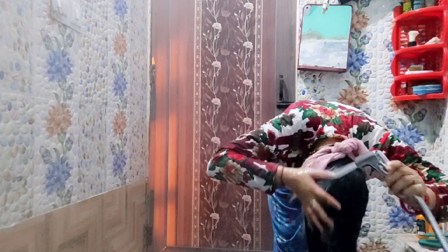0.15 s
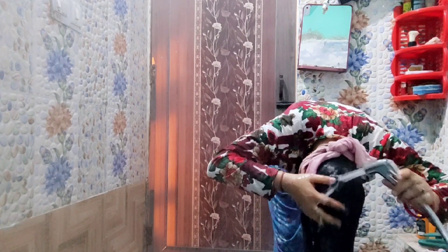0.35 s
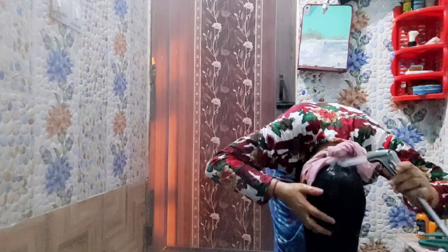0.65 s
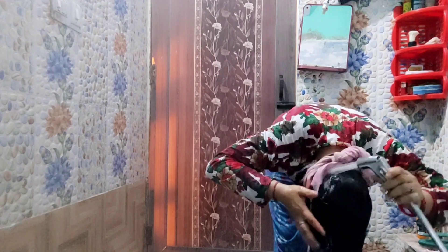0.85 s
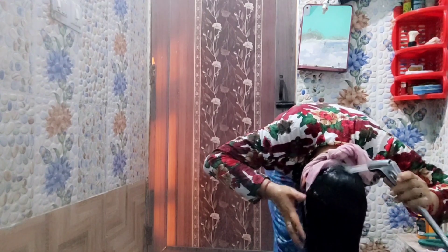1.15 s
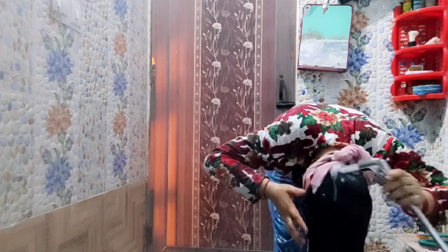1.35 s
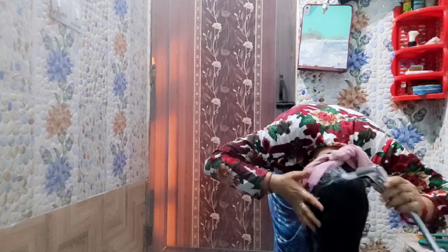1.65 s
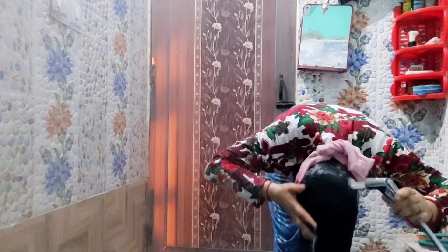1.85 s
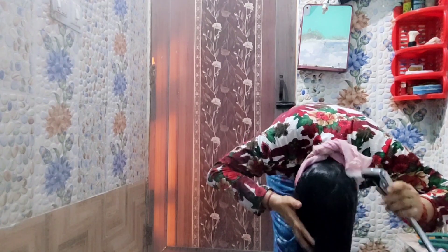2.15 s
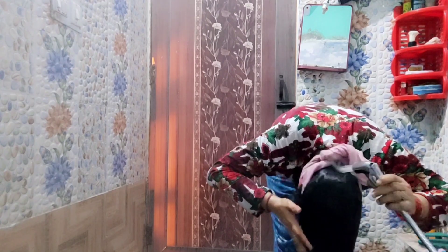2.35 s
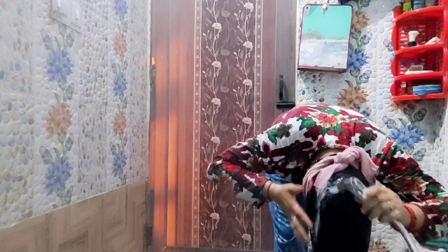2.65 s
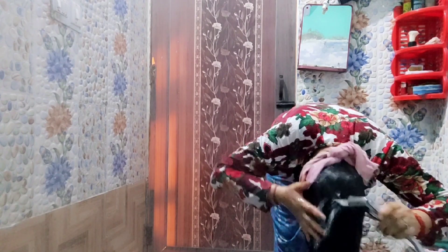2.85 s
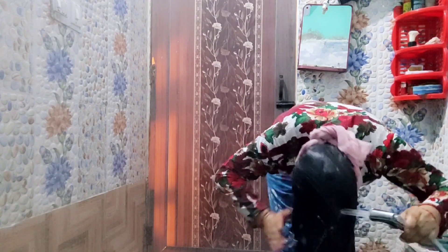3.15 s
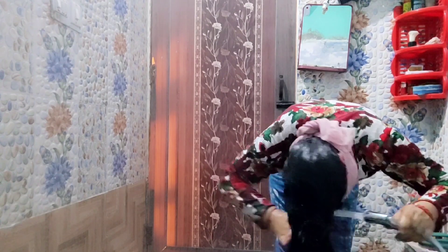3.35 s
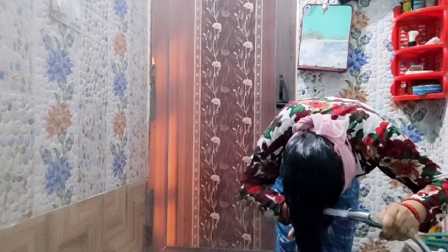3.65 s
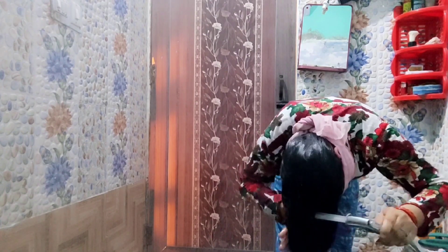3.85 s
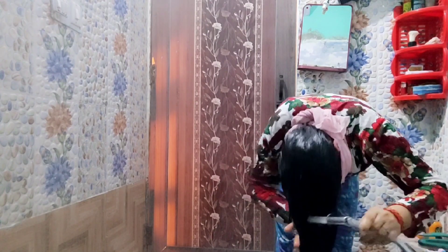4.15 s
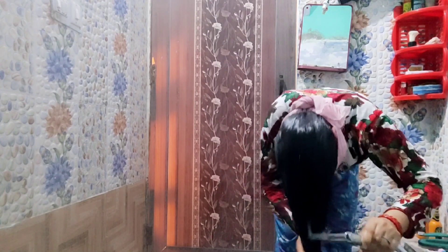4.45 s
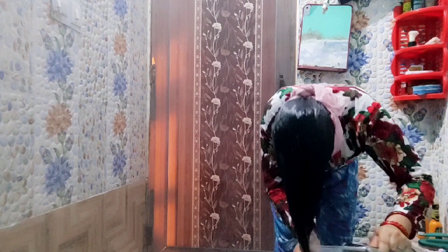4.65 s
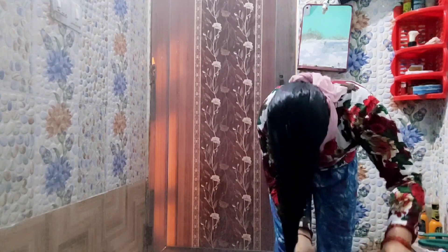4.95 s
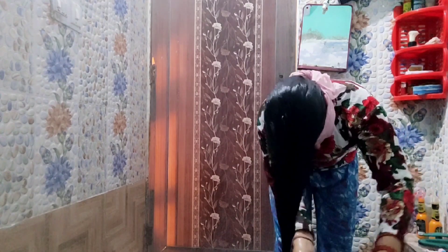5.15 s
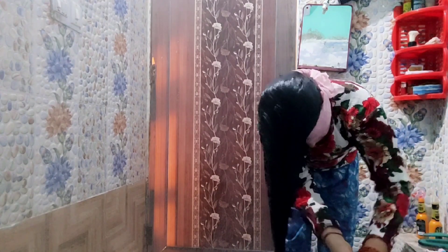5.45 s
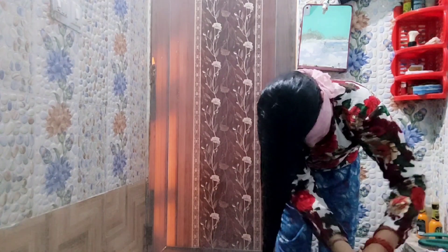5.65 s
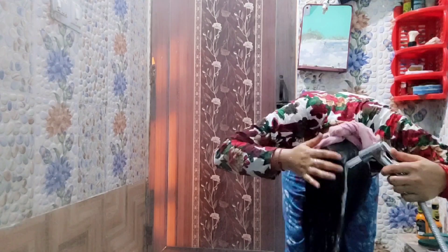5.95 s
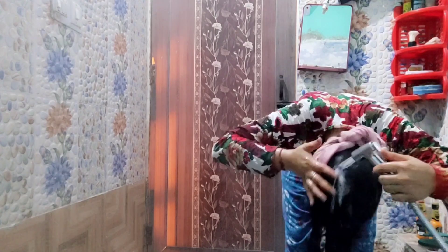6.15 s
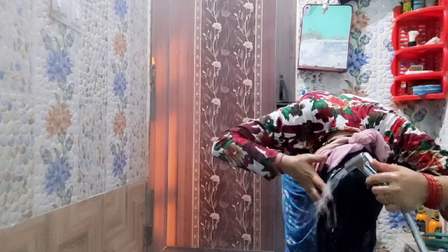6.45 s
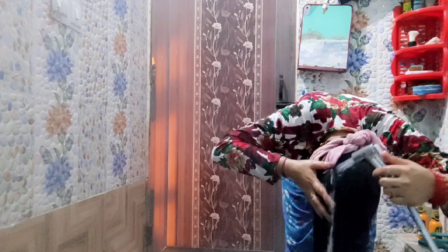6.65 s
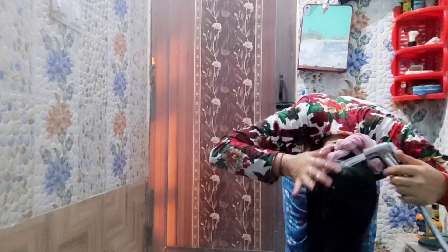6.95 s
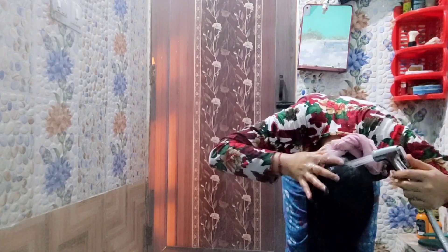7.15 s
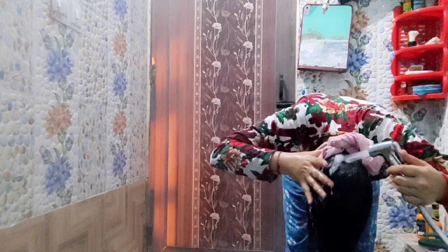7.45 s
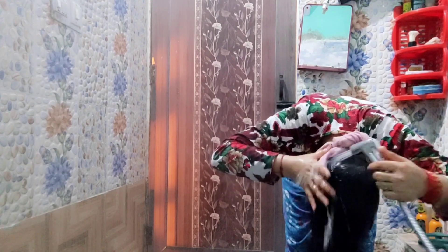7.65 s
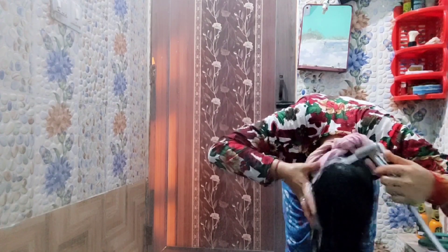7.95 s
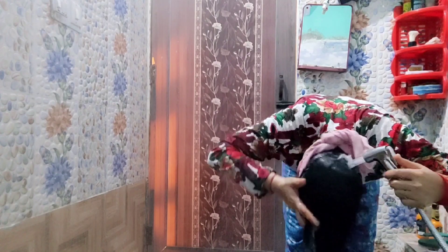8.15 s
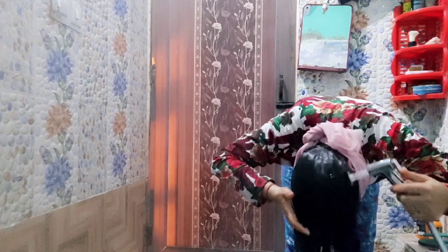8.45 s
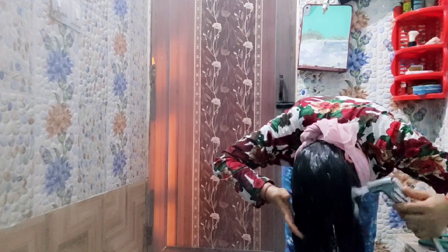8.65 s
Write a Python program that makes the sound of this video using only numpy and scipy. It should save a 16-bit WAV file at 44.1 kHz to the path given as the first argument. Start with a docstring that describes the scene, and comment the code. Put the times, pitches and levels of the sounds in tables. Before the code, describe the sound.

A handheld shower sprays wet hair in a small tiled bathroom, hissing and spattering brightly, cutting to a trickle once before bursting back.

```python
"""In a small tiled bathroom a handheld shower sprays wet hair. Jets, splash and mist are coloured noise
with random clicks; trapped air adds bubble tones, and a short noise burst sounds as each slap's rise ends.
The pocket between nozzle, hand and head rings hollow as a moving resonance; low gulps and narrow bands join it.
The valve closes and reopens once, a pump hums in sines over room tone, and the sound drops out twice.
Two microphone ports hear it, each favouring different treble."""
import sys
import numpy as np
from scipy import signal
from scipy.fft import rfft, irfft, next_fast_len
from scipy.io import wavfile
from scipy.ndimage import uniform_filter1d, map_coordinates

SR = 44100
rng = np.random.default_rng(int(sys.argv[2]) if len(sys.argv) > 2 else 0)


def materialize(psi):
    """Save the field psi as 16-bit PCM at rate SR to the path in sys.argv[1].

    A 1-D psi becomes a single channel; in a 2-D psi each row is a channel.
    """
    bounded = np.clip(np.atleast_2d(psi).T, -1, 1)
    quanta = np.round(bounded * 32767).astype(np.int16)
    wavfile.write(sys.argv[1], SR, quanta)


N = 387638

# Jet hiss, swelling as the nozzle sweeps over the head: (time [s], level at full flow [dB])
JET_LEVEL = [(0, -21), (.24, -19.5), (.32, -13), (.55, -14.5), (.85, -15.5), (1.0, -20.5), (1.22, -15.5),
             (1.68, -18.5), (1.93, -15.5), (2.2, -18.5), (2.48, -18.5), (2.63, -16), (2.7, -16),
             (2.84, -21), (3.06, -16), (3.3, -18), (3.58, -22), (4.05, -18.5), (4.18, -13), (4.42, -18.5),
             (4.66, -15.5), (4.78, -13.5), (5.07, -13), (5.27, -20.5), (5.44, -16), (6.09, -20),
             (6.3, -19.5), (6.58, -20), (6.68, -21.5), (6.77, -17.5), (6.92, -19.5), (7.23, -15.5),
             (7.5, -18.5), (7.76, -20.5), (7.81, -13.5), (8.02, -17), (8.13, -14), (8.37, -17), (8.54, -13),
             (8.79, -17)]
# Brief dips of the jets, followed by a jump where the peak is high enough: (time [s], peak [dB])
JET_SPURTS = [(0.2473, -8), (0.3052, 2), (0.38, -1.5), (0.4144, -1), (0.4894, 0.5), (0.5322, 1),
              (0.7841, -2.5), (0.8914, -12), (1.3234, -5.5), (1.725, -2), (2.3915, -5.5), (2.5546, -1.5),
              (2.5975, -22), (2.899, -1), (3.1527, -5), (3.2331, -4), (3.2854, -2), (3.3702, -5),
              (4.0936, -6), (4.3101, -4), (4.6548, -4), (4.8194, -14), (4.9028, -3), (5.011, 2.5),
              (5.1394, -1.5), (5.2879, -7), (5.3737, -4), (5.79, -16.5), (5.8735, -37), (6.0447, -12.5),
              (6.129, -5.5), (6.3355, -14), (6.4308, -7), (6.4941, -6.5), (6.7294, 3), (6.7935, -3),
              (7.0954, -3.5), (7.1541, -2.5), (7.2234, -1), (7.5672, -4.5), (7.8092, -2), (7.8544, -7),
              (7.9344, -4.5), (8.0571, -2), (8.4044, -4), (8.4754, -1)]
# Colour of the jets: (frequency [Hz], relative density [dB per Hz])
JET_SPECTRUM = [(3060, -33.5), (5200, -13), (6080, -9.5), (7810, 3.5), (9160, -3), (9940, -18),
                (10800, -81), (14000, -90), (22000, -120)]
# Colour of the splash: (frequency [Hz], relative density [dB per Hz])
SPLASH_SPECTRUM = [(900, -27), (1450, -6.5), (2200, -1.5), (2700, -1.5), (3600, -7), (5400, -9),
                   (7000, -19), (12000, -120)]
# Colour of the mist: (frequency [Hz], relative density [dB per Hz])
MIST_SPECTRUM = [(6060, -54), (10300, 0.5), (11400, -4.5), (14300, -8.5), (15500, -12.5)]
# Water striking hair and floor:
# (time [s], relative level at full flow [dB], brightness [dB], body [dB])
STRIKES = [(0, -33.5, 4.5, 3), (.18, -33.5, -5, -6), (.48, -35.5, 16, -7), (.67, -29, 4.5, 0),
           (1.0, -34.5, 2, 0), (1.42, -30, 2.5, -3), (1.7, -35, 3, -1.5), (1.92, -37, 11, 6),
           (2.18, -33, 5, -5.5), (2.68, -36, 2, 0), (3.05, -35.5, 8.5, -1.5), (3.55, -37.5, -3, -1),
           (3.68, -36, 5.5, 3), (3.87, -34.5, 1, 3), (4.45, -32, 8.5, 0), (4.66, -38.5, 14, -2.5),
           (4.86, -31.5, 5.5, -5), (5.2, -33.5, 6, -6), (5.36, -32, 6, -12), (5.5, -36.5, 12, -11),
           (5.74, -38, 9.5, 2), (5.9, -45.5, 12.5, -4), (6.38, -36, 2, 3.5), (6.68, -34.5, 5, -13),
           (7.1, -39, 8, -1), (7.38, -33.5, 3, -10), (7.56, -35.5, 6.5, 3), (7.86, -37, 1.5, -4.5),
           (8.15, -29.5, 2.5, -6.5), (8.26, -37, 10, 10), (8.5, -34.5, 11.5, 1), (8.79, -40.5, 14.5, 8)]
# A load of water slaps down: (time [s], lift [dB], hold [s], brightness change [dB])
WATER_SLAPS = [(0.299, 5, 0.049, -9.5), (0.524, -0.5, 0.027, 4.5), (3.261, -0.5, 0.094, 8.5),
               (4.94, 6, 0.17, -7), (5.127, 3, 0.038, 2), (6.707, 2.5, 0.15, 5), (7.186, 3, 0.035, 3.5),
               (7.923, 11.5, 0.036, 2.5), (8.302, 0.5, 0.053, 5.5)]
# Colour of the burst at the end of a slap's rise: (frequency [Hz], relative density [dB per Hz])
CRACK_SPECTRUM = [(1000, -20), (1800, -2), (4500, -4), (7000, -10), (12000, -60)]
# Air pocket round the stream: (time [s], relative level at full flow [dB], centre [Hz])
AIR_POCKET = [(0, -35, 1000), (.5, -40.5, 1250), (.79, -35.5, 1220), (1.2, -38, 1200), (1.35, -30, 1090),
              (1.5, -34.5, 990), (1.62, -32.5, 1030), (1.69, -37.5, 1150), (1.78, -35, 1390),
              (2.07, -30, 1180), (2.28, -40, 1190), (2.5, -35, 1200), (2.6, -33, 1120), (2.74, -34.5, 1000),
              (2.94, -40.5, 1200), (3.1, -38.5, 970), (3.5, -40, 700), (3.57, -39.5, 560),
              (3.68, -38.5, 583), (3.78, -31, 640), (3.88, -36.5, 730), (3.98, -26.5, 764),
              (4.08, -32.5, 706), (4.19, -33, 705), (4.24, -40, 760), (4.3, -38, 1030), (4.48, -33, 1140),
              (4.62, -37.5, 1030), (5.05, -42, 1200), (5.15, -33.5, 1250), (5.3, -45, 1150),
              (5.45, -49, 1060), (5.7, -38, 900), (5.93, -50, 900), (6.12, -44.5, 1210), (6.6, -37, 1240),
              (6.9, -42, 1120), (7.3, -41.5, 1220), (7.42, -33.5, 1260), (7.58, -33.5, 1090),
              (7.95, -41, 1260), (8.45, -38.5, 1190), (8.79, -34.5, 1150)]
# Water gulps low in the soaked hair: (time [s], level [dB])
HAIR_GULPS = [(3.62, -40), (3.71, -49), (3.8, -44), (4.0, -63)]
# Water rings in a narrow band for a moment:
# (start [s], end [s], start frequency [Hz], end frequency [Hz], width [Hz], relative level [dB])
NARROW_RINGS = [(1.31, 1.37, 1150, 1150, 120, -42), (1.41, 1.65, 1000, 975, 130, -39),
                (2.0, 2.15, 1240, 1270, 150, -43), (2.63, 2.85, 850, 850, 90, -47),
                (2.6, 2.75, 1040, 1030, 110, -44), (3.55, 3.68, 590, 570, 80, -44),
                (3.7, 3.92, 620, 760, 240, -41), (5.7, 5.88, 1620, 1620, 130, -61)]
# Hum of the pump: (frequency [Hz], level before the port difference [dB rms])
PUMP_PARTIALS = [(65.4, -48), (130.8, -65), (196, -65.5), (250, -67)]
# Colour of the room tone: (frequency [Hz], relative density [dB per Hz])
ROOM_SPECTRUM = [(15, 9.5), (25, -1), (55, -0.5), (90, -8), (130, -7.5), (250, -6.5), (400, -6.5),
                 (600, -15.5), (1000, -16), (1600, -20), (2400, -120)]
# Standing waves between the walls: (frequency [Hz], width [Hz], level [dB])
WALL_MODES = [(232, 20, -7), (586, 25, -2), (666, 25, -3), (748, 25, -2), (851, 20, -3), (961, 20, -5),
              (1522, 35, -4), (1711, 30, -4), (1970, 25, -3)]
# Correlation between the ports: (frequency [Hz], left-right likeness [1])
PORT_LIKENESS = [(60, 0.65), (160, 0.16), (400, 0.79), (800, 0.19), (1200, 0.049), (5600, 0), (6200, 0.43),
                 (6700, 0.56), (7300, 0.96), (7800, 0.87), (8300, 0.6), (9200, 0.27), (9900, 0),
                 (15000, 0.23)]
# Balance of the ports: (frequency [Hz], left minus right [dB])
PORT_BALANCE = [(30, 2), (140, 4.5), (300, 2), (770, 2.5), (1500, 1.5), (2100, 0.5), (3600, -0.5),
                (5700, -2.5), (6500, -6), (7250, -4.5), (7750, -6), (8300, -4.5), (9300, 16), (9900, -17),
                (10600, 0), (12000, 0)]
# Brief losses of sound, snapping off and coming back a little softer: (time [s], gain [dB])
SOUND_DROPOUTS = [(5.9545, 0), (5.9565, -20), (5.969, -27), (5.976, -52), (5.99, -75), (6.005, -75),
                  (6.009, -7), (6.012, -3), (6.0325, -3), (6.034, -30), (6.036, -26), (6.039, -12),
                  (6.046, 0)]

TOP_HZ = 15690  # upper band limit
BROAD_HOP, NARROW_HOP = 128, 512  # samples between frames: broad patches, narrow streaks in frequency
VALVE_SHUT_S, VALVE_OPEN_S, FLOW_FULL_S = 5.456, 5.787, 6.014  # starts to close, catches again, full flow
FADE_DB_PER_S, TRICKLE_DB = 91, -16.5  # fall while closing, trickle it reaches
CATCH_S, CATCH_DB = .004, -13.5  # time the flow takes to catch, flow just after
SPLASH_WITH_VALVE = 0.81  # run-off keeps dripping: share of the flow's fall that splash and pocket follow
SPURT_CREST_DB, SPURT_RISE_S, SPURT_FADE_S = 11, 0.0056, 0.024  # peak over steady hiss, rise, decay constant
FALTER_DB, FALTER_S = -2, 0.016  # dip ahead of each event's time, its time constant
SPURT_IN_SPLASH, MIST_SPURT = 0.2, 1.4  # shares of the dips and jumps that splash and mist follow
SLAP_ATTACK_S, SLAP_RELEASE_S, SLAP_THIN = 0.0042, 0.11, 0.42  # rise, fall, share of lift the body misses
CRACK_DB, CRACK_T60_S = -24, 0.013  # burst level, to which the slap's lift is added; time to fall 60 dB
SHARPEN_PER_DB, POCKET_USUAL_DB = 0.1, -37  # a pocket blown harder than usual rings narrower
GULP_ATTACK_S, GULP_HOLD_S, GULP_DB_PER_S = 0.031, 0.088, 80
RING_EDGE_S = .02  # half the length of each fade


def spray():
    """Common modulation: jets, splash and mist sputter together as the flow breaks up."""
    hiss_db = curves(JET_LEVEL)[0] + valve()
    spurt_db = spurts(hiss_db)
    sputter = wobble(18)
    water_noise = jets(hiss_db, spurt_db, sputter) + splash(spurt_db, sputter) + mist(hiss_db, spurt_db, sputter)
    return water_noise + fizz() + burble()


def jets(hiss_db, spurt_db, sputter):
    """Broadband jet noise: fine streams hiss in step with the flow, with slow random surges."""
    level_db = hiss_db + spurt_db + 0.5 * sputter + 0.33 * wobble(9.0)
    return amp(level_db) * water(JET_SPECTRUM, grain=0.06, rate=2500, patchy_db=2.0, streaky_db=10.5)


def splash(spurt_db, sputter):
    """Impact noise: a glancing strike is brighter, a thick stream has more body."""
    strike_db, bright_db, body_db = striking(step=BROAD_HOP)

    def strike(hz):
        """Spectral tilt: moving shelves change the treble and the body."""
        treble_db = bright_db / (1 + (3200 / (hz + 1)) ** 8)
        low_db = body_db / (1 + (hz / 2200) ** 8)
        return amp(strike_db + treble_db + low_db)

    level_db = -29.5 + SPURT_IN_SPLASH * spurt_db + 0.76 * sputter + 0.39 * wobble(8)
    noise = water(SPLASH_SPECTRUM, grain=0.06, rate=1400, patchy_db=-1.0, streaky_db=8.0, shape=strike)
    return amp(level_db) * noise


def mist(hiss_db, spurt_db, sputter):
    """Partial coupling: the finest mist follows the jets only in part but dips and jumps further."""
    level_db = -28.0 + 0.5 * hiss_db + 0.51 * valve() + MIST_SPURT * spurt_db + 1.0 * sputter
    return amp(level_db) * water(MIST_SPECTRUM, grain=.1, rate=3000, patchy_db=4.5, streaky_db=3)


def fizz():
    """Bubble resonance: small bubbles ring high and follow the strikes and slaps."""
    return amp(striking()[0] - 8.5) * bubbles(mid_hz=3270, spread=0.403, cycles=7.7, count=6000)


def burble():
    """Bubble resonance: larger bubbles ring lower and follow the strikes without the slaps."""
    level_db = curves(STRIKES)[0] + SPLASH_WITH_VALVE * valve() - 14.0 + 2.0 * wobble(6)
    return amp(level_db) * bubbles(mid_hz=1900, spread=0.3, cycles=9, count=2500)


def valve(step=1):
    """Flow control, in dB: it dies to a trickle as the valve closes, catches part-way and recovers."""
    low_s = np.clip(VALVE_SHUT_S - TRICKLE_DB / FADE_DB_PER_S, VALVE_SHUT_S, VALVE_OPEN_S)
    flow = [(VALVE_SHUT_S, 0), (low_s, TRICKLE_DB), (VALVE_OPEN_S, TRICKLE_DB - 3.0),
            (VALVE_OPEN_S + CATCH_S, CATCH_DB), (FLOW_FULL_S, 0)]
    return curves(flow, step=step)[0]


def spurts(hiss_db):
    """Transients, in dB: each dips briefly; if its peak is high enough the hiss jumps up to 7 dB and dies back."""
    gain_db = np.zeros(N)
    t = np.arange(N) / SR
    for s, peak_db in JET_SPURTS:
        near = slice(max(int((s - .1) * SR), 0), int((s + .2) * SR))
        lift_db = np.clip(peak_db - SPURT_CREST_DB - hiss_db[int(s * SR)], 0, 7)
        late = t[near] - s + SPURT_RISE_S
        up = np.clip(late / SPURT_RISE_S, 0, 1)
        gain_db[near] += up * lift_db * np.exp(-np.abs(late) / SPURT_FADE_S)
        gain_db[near] += (1 - up) * FALTER_DB * np.exp(-np.abs(late) / FALTER_S)
    return gain_db


def striking(step=1):
    """Impact strength: level, brightness and body of the splash, with the slaps on top."""
    level_db, bright_db, body_db = curves(STRIKES, step=step)
    for s, lift_db, hold, turn_db in WATER_SLAPS:
        top = s + SLAP_ATTACK_S
        held = top + hold
        on = curves([(s, 0), (top, 1), (held, 1), (held + SLAP_RELEASE_S, 0)], step=step)[0]
        level_db = level_db + lift_db * on
        bright_db = bright_db + turn_db * on
        body_db = body_db - SLAP_THIN * lift_db * on
    return level_db + SPLASH_WITH_VALVE * valve(step=step), bright_db, body_db


def cracks():
    """Exponential decay: a short noise burst sounds as each slap's rise ends."""
    t = np.arange(N) / SR
    size = np.zeros(N)
    for s, lift_db, _, _ in WATER_SLAPS:
        late = t - s - SLAP_ATTACK_S
        decay_db = 60 * np.clip(late, 0, None) / CRACK_T60_S
        size += (t >= s + SLAP_ATTACK_S) * amp(CRACK_DB + lift_db - decay_db)
    return size * ports(rng.standard_normal((2, N)), lambda hz: amp(along(CRACK_SPECTRUM, hz)))


def pocket():
    """Cavity resonance: the stream blows a peak that moves with the hand; walls pick out their modes."""
    level_db = curves(AIR_POCKET)[0] + SPLASH_WITH_VALVE * valve() + 0.83 * wobble(11)
    blown_db, centre = curves(AIR_POCKET, step=NARROW_HOP)
    sharp = 1.8 * np.exp(SHARPEN_PER_DB * (blown_db - POCKET_USUAL_DB))

    def hollow(hz):
        """Resonance curve: steep below, a skirt above, the same power wherever it sits."""
        off = hz / centre - centre / (hz + 1)
        skirt = 0.24 + 0.18 / (1 + np.exp(-8 * np.clip(off, -5, 5)))
        gain = skirt + 1 / (1 + (sharp * off) ** 2)
        gain = gain * (hz > 400) * (hz < 1700)
        return gain / np.sqrt(np.mean(gain ** 2, axis=0))

    edges = lambda hz: amp(along([(380, -16), (500, -5.5), (1400, -1.5), (1700, -4.5)], hz))
    raw = patches(rng.standard_normal((2, N)), patchy_db=5.0, shape=hollow, hop=NARROW_HOP)
    return amp(level_db - 3.0) * ports(raw, lambda hz: walls(hz) * edges(hz))


def gurgle():
    """Enveloped low noise: gulps of water rise quickly, hold and fade."""
    t = np.arange(N) / SR
    size = np.zeros(N)
    for s, db in HAIR_GULPS:
        fade_db = GULP_DB_PER_S * np.clip(t - s - GULP_HOLD_S, 0, None)
        size += amp(db - fade_db) * np.clip((t - s) / GULP_ATTACK_S, 0, 1)
    colour = [(120, -34), (200, -0.5), (250, 0.5), (380, -2.0), (520, -18)]  # (frequency [Hz], density [dB])
    return size * amp(2.3 * wobble(18)) * water(colour, grain=0.091, rate=190, patchy_db=8.0)


def trickle():
    """Quadrature modulation: slow noise on a carrier makes narrow, broken bands that may glide."""
    out = np.zeros((2, N))
    for start, end, from_hz, to_hz, width_hz, db in NARROW_RINGS:
        on, hz = curves([(start - RING_EDGE_S, 0, from_hz), (start + RING_EDGE_S, 1, from_hz),
                         (end - RING_EDGE_S, 1, to_hz), (end + RING_EDGE_S, 0, to_hz)])
        turn = 2 * np.pi * np.cumsum(hz) / SR
        first, second = [wobble(width_hz) * np.cos(turn) + wobble(width_hz) * np.sin(turn) for _ in range(2)]
        both = np.array([first + 0.77 * second, first - 0.55 * second])
        out += amp(db) * on * both * amp([[1.1], [-1.1]])
    return out * amp(2.3 * wobble(24.97))


def room():
    """Steady background: broadband room tone under the hum of the pump."""
    noise = patches(rng.standard_normal((2, N)), patchy_db=6.5, hop=NARROW_HOP)
    tone = ports(noise, lambda hz: amp(along(ROOM_SPECTRUM, hz)))
    return pump() + amp(-46.0 + 0.11 * wobble(2.3)) * tone


def pump():
    """Periodic vibration: sine partials share a slight frequency drift, each with an unsteady level."""
    t = np.arange(N) / SR
    drift = np.cumsum(0.18 * wobble(3.5)) / SR  # cycles of the lowest partial
    turns = t + drift / PUMP_PARTIALS[0][0]
    hum = sum(amp(db + 1.5 * wobble(8)) * np.sqrt(2) * np.sin(2 * np.pi * hz * turns) for hz, db in PUMP_PARTIALS)
    return hum * amp([[1.1], [-1.1]])


def walls(hz):
    """Room modes: the tiled room lifts its own standing waves."""
    return 1.0 + sum(amp(db) / (1 + (2 * (hz - c) / w) ** 2) for c, w, db in WALL_MODES)


def water(spectrum, grain, rate, patchy_db, streaky_db=0, shape=None):
    """Coloured noise with random clicks, its level varied at random in broad patches and narrow streaks."""
    grain = np.clip(grain, 0, 1)  # share of the power in clicks
    raw = np.sqrt(1 - grain) * rng.standard_normal((2, N)) + np.sqrt(grain) * drops(rate, spread_db=-0.5)
    streaked = patches(raw, streaky_db, hop=NARROW_HOP)
    uneven = patches(streaked, patchy_db, shape)
    return ports(uneven, lambda hz: amp(along(spectrum, hz)) * walls(hz))


def drops(rate, spread_db):
    """Poisson-like impacts: two unrelated streams of random clicks, rate per second, sizes spread in dB."""
    hits = rng.random((2, N)) < rate / SR
    return unit(hits * rng.standard_normal((2, N)) * amp(spread_db * rng.exponential(size=(2, N))))


def bubbles(mid_hz, spread, cycles, count):
    """Bubble resonance: trapped air rings with a soft start and rising pitch, each heard at one port."""
    length = 900  # samples of each ring
    draw = rng.random((count, 4))
    hz = mid_hz * np.exp(spread * np.clip(rng.standard_normal((count, 1)), -2, 2))
    turns = hz * np.arange(length) / SR
    life = turns / cycles
    envelope = life * np.exp(-2 * life)
    rings = np.sin(2 * np.pi * turns * (1 + 0.07 * life)) * envelope * draw[:, :1] ** 3
    # both ports lie end to end, so an offset picks the port
    start = (draw[:, 1:2] * N).astype(int) + (draw[:, 2:3] < .5) * (N + length)
    both = np.bincount((start + np.arange(length)).ravel(), rings.ravel(), 2 * (N + length))
    return unit(both.reshape(2, -1)[:, :N])


def patches(pair, patchy_db, shape=None, hop=BROAD_HOP):
    """Time-varying filtering: random gain patches in time and frequency, and a colour that may move."""
    hz, _, z = signal.stft(pair, SR, nperseg=2 * hop)
    field = uniform_filter1d(rng.standard_normal(z.shape[1:]), size=2, axis=0)
    field = unit(uniform_filter1d(field, size=1536 // hop, axis=1))
    # positive values level off; with a positive depth peaks are limited and hollows go deep
    z = z * amp(patchy_db * np.where(field > 0, np.tanh(field), field))
    if shape:
        z = z * shape(hz[:, None])[:, :z.shape[-1]]
    return signal.istft(z, SR, nperseg=2 * hop)[1][:, :N]


def ports(pair, gain):
    """Partial coherence: two coloured streams mix into two microphone ports; their mean has rms 1."""
    turn = lambda hz: np.arccos(np.clip(along(PORT_LIKENESS, hz), -.95, .98)) / 2
    mid, side = filtered(pair, lambda hz: gain(hz) * [np.cos(turn(hz)), np.sin(turn(hz))])
    balance = lambda hz: amp(along(PORT_BALANCE, hz) * [[.5], [-.5]])
    both = filtered(np.array([mid + side, mid - side]), balance)
    return both / np.sqrt(np.mean(both.mean(axis=0) ** 2))


def amp(db):
    """Decibel law: amplitude ratio of a level in dB."""
    return 10 ** (np.asarray(db) / 20)


def unit(x):
    """Power normalisation: x scaled to rms 1."""
    return x / np.sqrt(np.mean(x ** 2) + 1e-20)


def along(points, hz):
    """Logarithmic frequency scale: (frequency [Hz], value) points joined on a log axis."""
    f, v = np.transpose(points)
    return np.interp(np.log(hz + 1), np.log(f + 1), v)


def curves(rows, step=1):
    """Linear interpolation: each column after the time, one value per step of samples."""
    s, *cols = np.transpose(rows)
    return [np.interp(np.arange(0, N + 2 * step - 2, step) / SR, s, c) for c in cols]


def wobble(rate):
    """Band-limited fluctuation: a smooth random curve, rate knots per second."""
    return map_coordinates(rng.standard_normal(int(N * rate / SR) + 4), [np.arange(N) * rate / SR])


def filtered(x, response):
    """Convolution theorem: the spectrum of x times a response of frequency."""
    m = next_fast_len(N + 8192)
    return irfft(rfft(x, m) * response(np.fft.rfftfreq(m, 1 / SR)), m)[..., :N]


def scene():
    """Superposition: the water sources and the background add linearly."""
    return spray() + cracks() + pocket() + gurgle() + trickle() + room()


def record(dry):
    """Channel limits: dropouts, soft clipping towards full scale and an upper band limit."""
    gated = dry * amp(curves(SOUND_DROPOUTS)[0])
    clipped = gated / (1 + np.abs(gated) ** 8) ** (1 / 8)
    return filtered(clipped, lambda hz: np.clip((TOP_HZ + 60 - hz) / 120, 0, 1) ** 2)


dry = scene()
out = record(dry)
materialize(out)
```